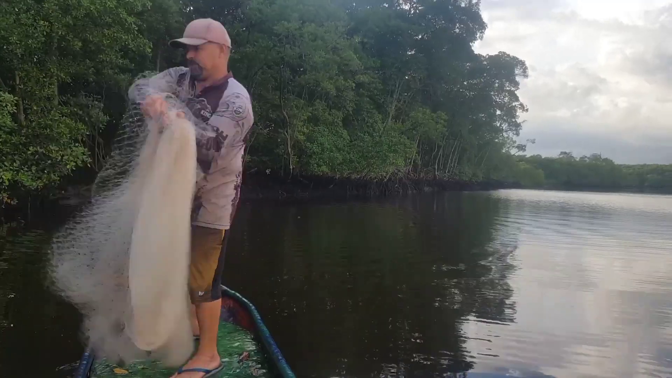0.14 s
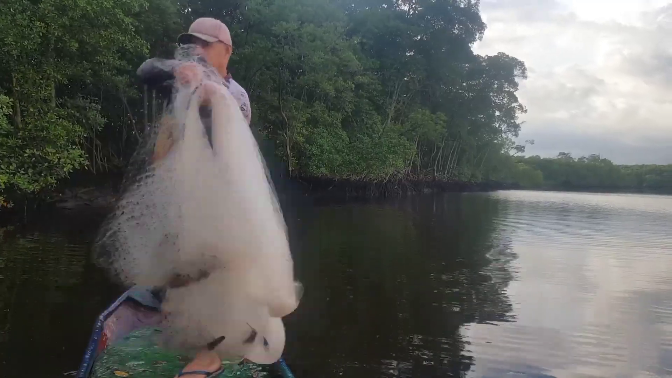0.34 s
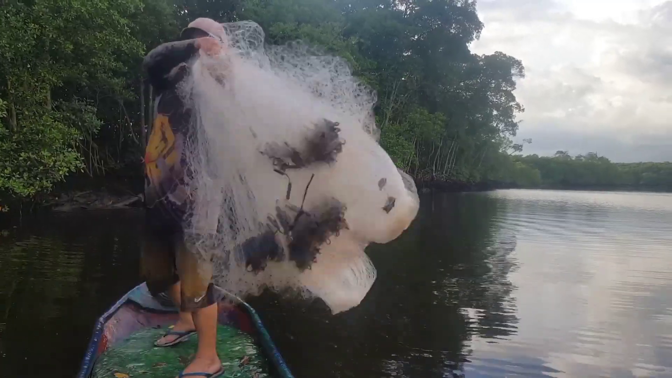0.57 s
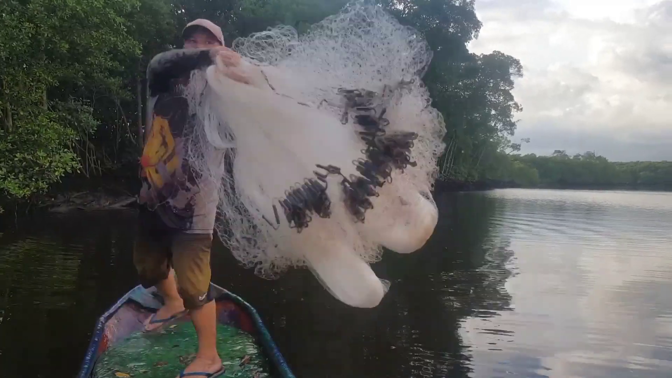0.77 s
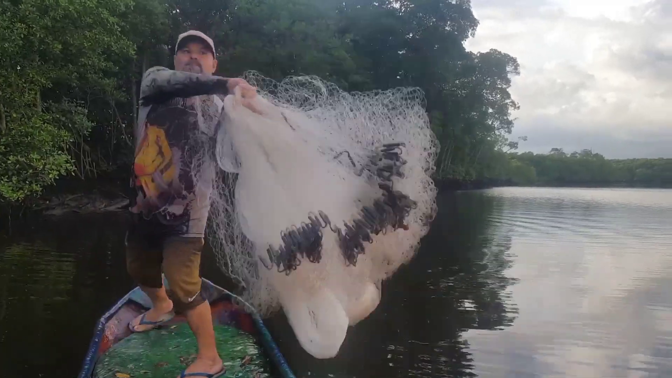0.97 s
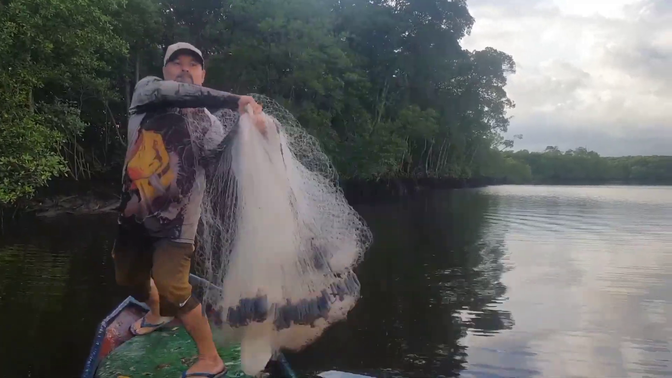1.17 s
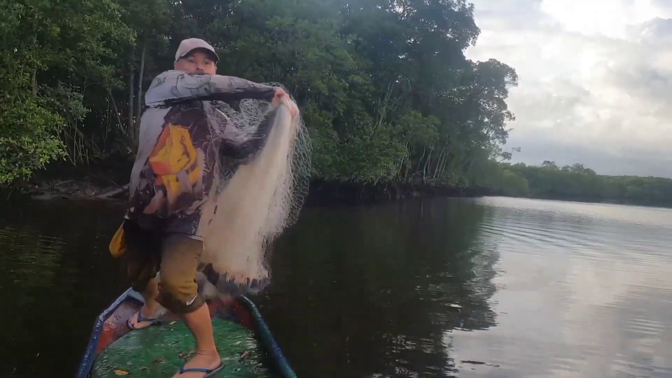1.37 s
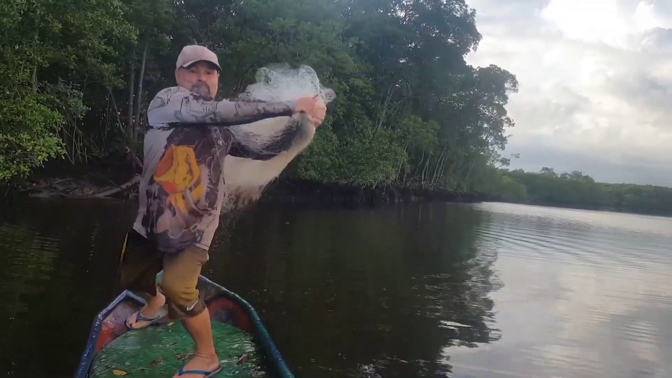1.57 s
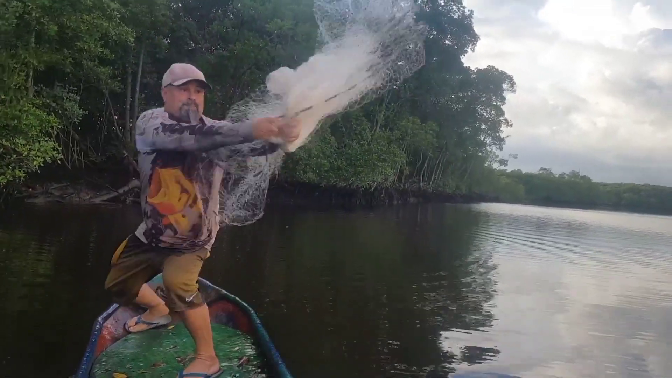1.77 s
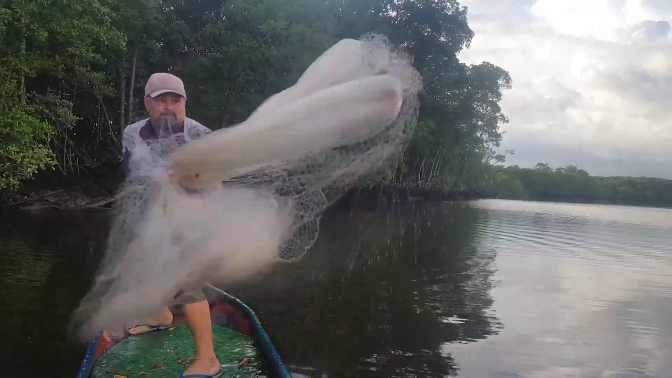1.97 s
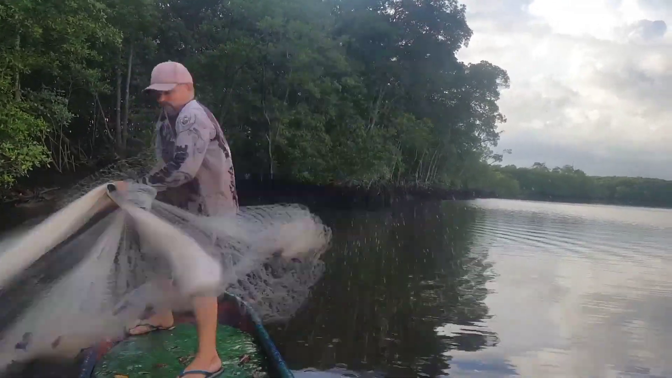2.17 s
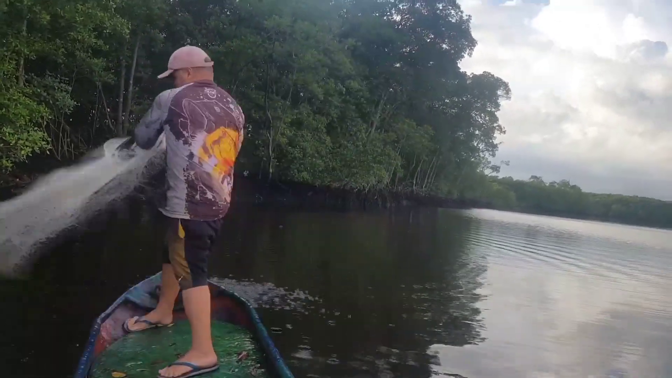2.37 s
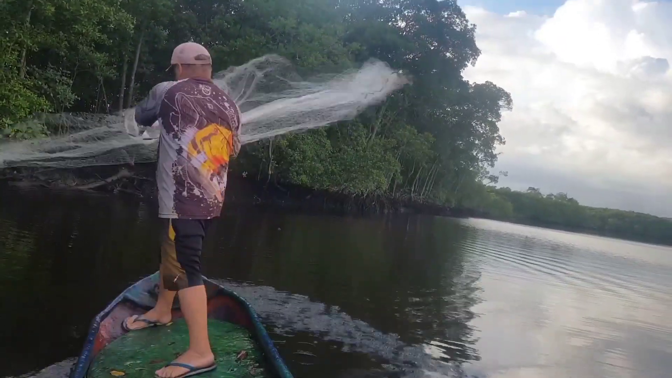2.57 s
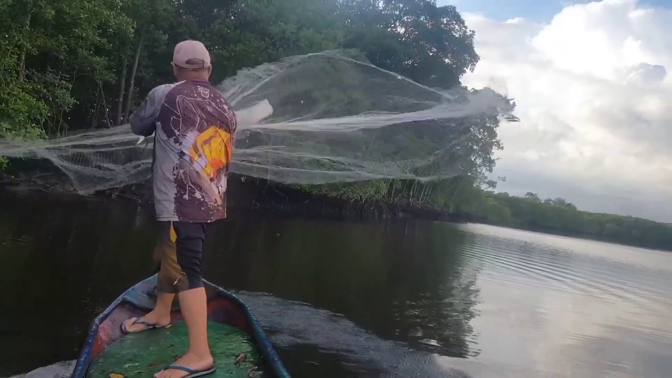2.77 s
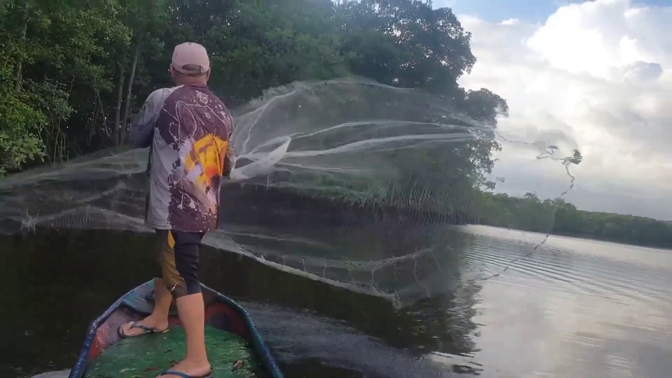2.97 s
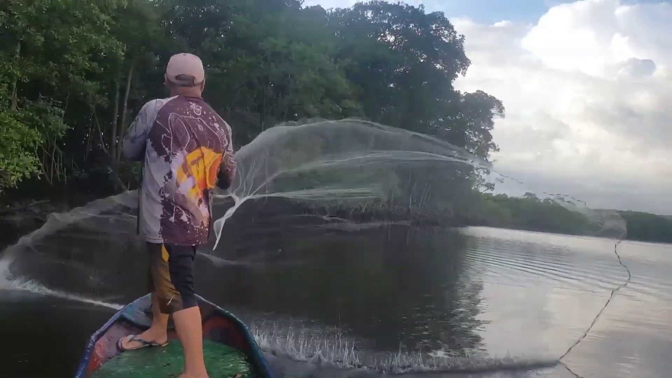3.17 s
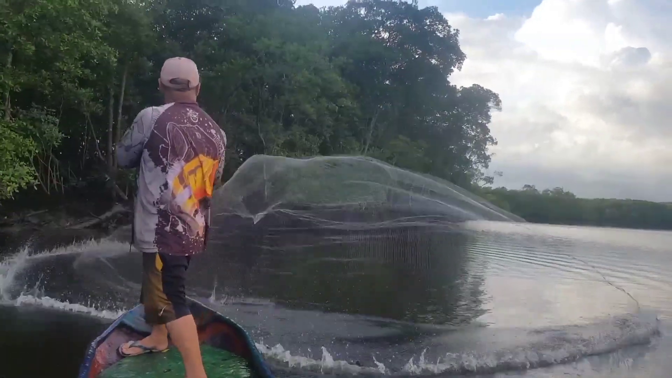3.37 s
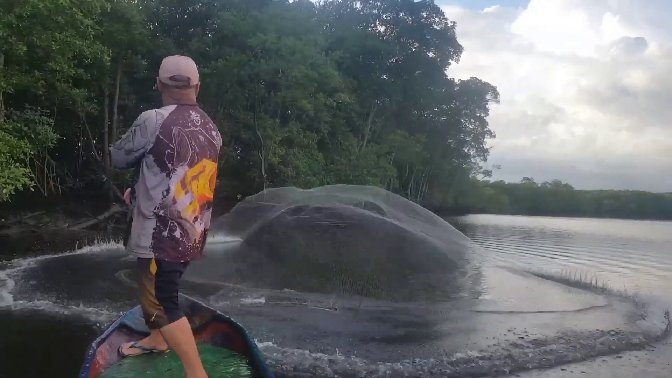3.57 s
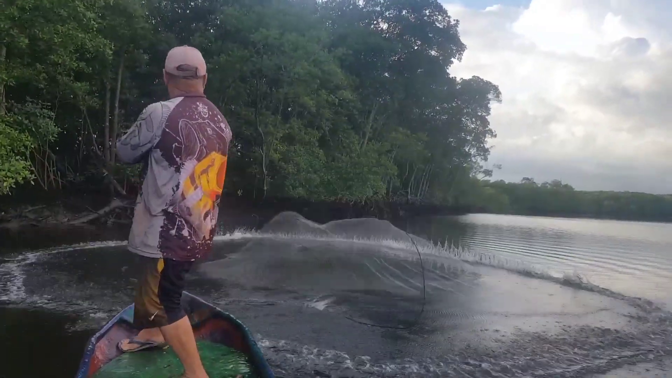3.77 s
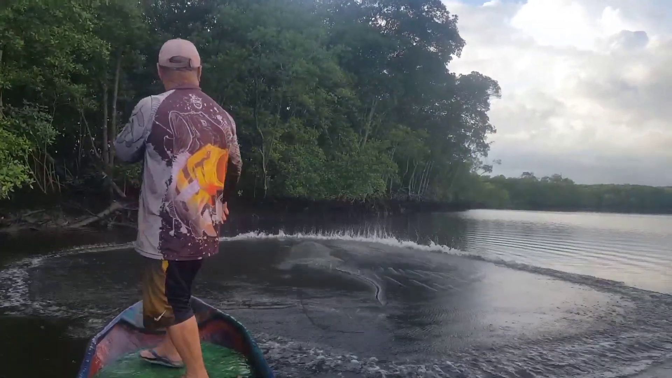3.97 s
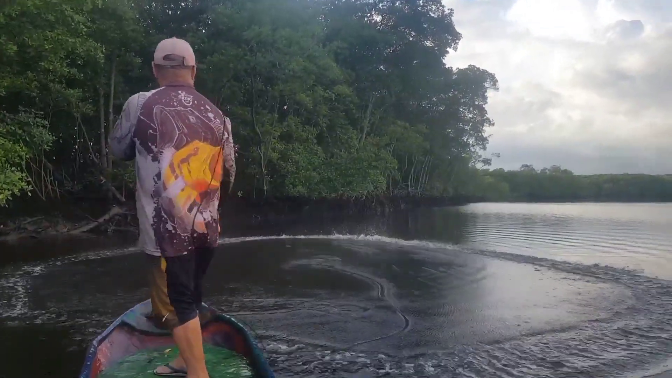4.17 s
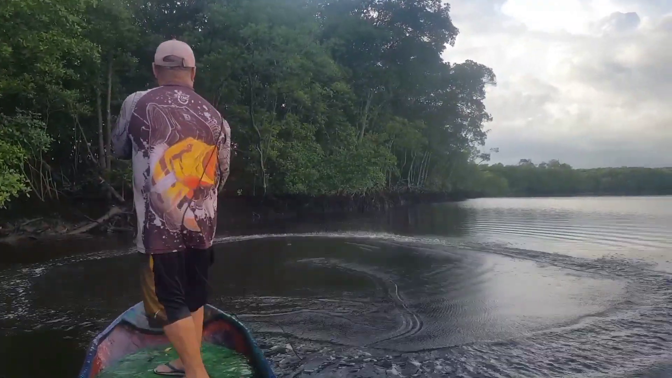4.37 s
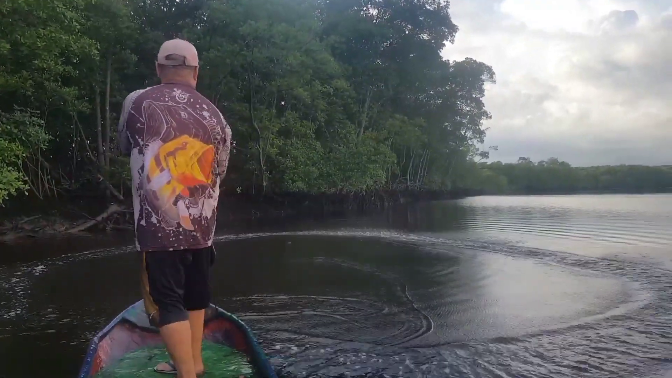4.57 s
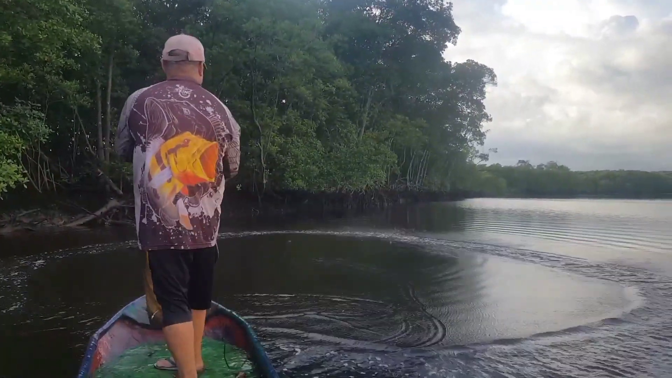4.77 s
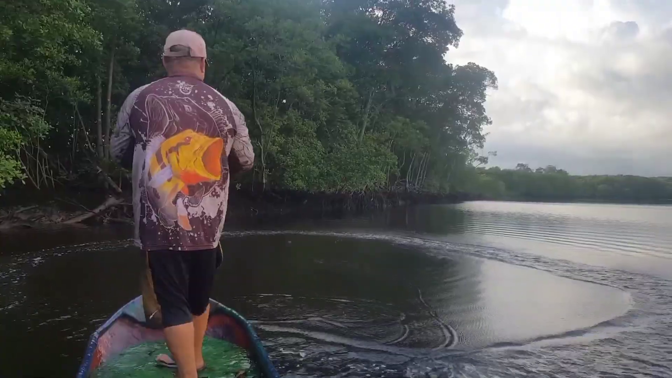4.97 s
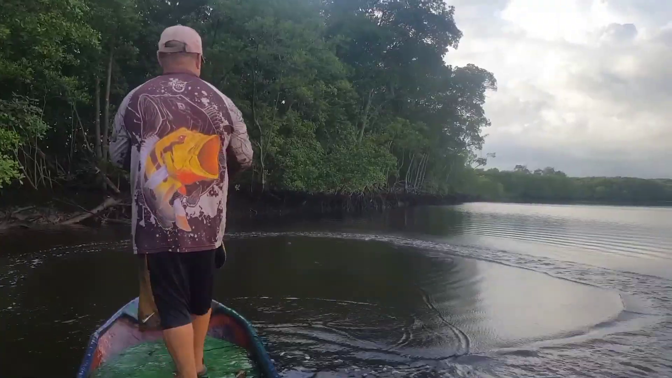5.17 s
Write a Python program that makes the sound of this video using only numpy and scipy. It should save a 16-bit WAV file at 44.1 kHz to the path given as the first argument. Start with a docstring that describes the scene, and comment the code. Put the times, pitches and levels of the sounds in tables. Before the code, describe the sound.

Close outdoor stereo: light mesh rustles, small ticks and dull wooden thumps, with thin bird chirps echoing in trees. A sharp hull knock comes before the throw, then a swish of net with bright metallic clinking. The net lands with sharp smacks and a broad pattering splash, bubbles froth and gurgle, and the water calms to quiet drips and faint boat knocks over a soft air bed.

```python
"""A cast net is swung and thrown from a small wooden boat on a calm river lined with trees.
Its wet mesh rustles as coloured random clicks and flaps as dull bubbles; lead weights ring as struck modes.
The rim strikes the water in a ring of spray clicks and ringing bubbles that dies to single rising drips.
Feet and gear knock the hull, noise pushed through its modes. Small birds whistle in gliding sines,
echoed by the trees, over a soft bed of filtered noise for the air."""
import sys
import numpy as np
from scipy import signal
from scipy.io import wavfile
from scipy.ndimage import map_coordinates

SR = 44100
rng = np.random.default_rng(int(sys.argv[2]) if len(sys.argv) > 2 else 0)


def transcribe(signal):
    """Save signal, clipped to [-1, 1], as a 16-bit WAV file at the path in sys.argv[1]."""
    frames = np.atleast_2d(signal).T
    limited = np.clip(frames, -1, 1)
    pcm = np.round(limited * 32767).astype(np.int16)
    wavfile.write(sys.argv[1], SR, pcm)


N = 230907  # length in samples

# the gathered net swings round and opens in the air: (time [s], rustle level [dB])
NET_SWING = [(1.1, -57), (1.16, -58), (1.36, -52.5), (1.44, -45.5), (1.71, -54.5), (1.85, -61), (1.96, -40),
             (2.1, -44.5), (2.21, -35), (2.41, -41), (2.74, -47.5), (3.07, -50), (3.13, -55), (3.15, -90)]
# tugs at the wet mesh: (time of the top [s], rustle level [dB], dull flapping level [dB], fall constant [s])
MESH_TUGS = [(0.066, -54.5, -56, 0.059), (0.157, -45, -28, 0.02), (0.2, -52, -51, 0.021),
             (0.236, -48.5, -47.5, 0.045), (0.372, -56, -61, 0.43), (0.89, -52.5, -45.5, 0.048),
             (1.05, -55, -33, 0.011), (1.152, -45.5, -39, 0.047), (1.231, -49, -36.5, 0.014),
             (1.286, -53, -33.5, 0.012), (1.439, -67, -45, 0.12), (1.778, -42.5, -43, 0.06),
             (2.1, -48, -39.5, 0.028), (2.209, -52, -35, 0.042), (2.979, -40.5, -43.5, 0.01),
             (3.091, -53, -47, 0.017)]
# tone of the rustling mesh: (frequency [Hz], relative level [dB per Hz])
MESH_TONE = [(530, -29), (900, -0.5), (1370, -9.5), (1470, -7), (2780, -0.5), (3250, -11.5), (4180, -5.5),
             (6660, -13.5), (9320, -18.5), (12600, -21.5), (15800, -34)]
TUG_RISE_S = 0.0051
SWING_FLAP_DB = -8  # flapping relative to the rustle


def net():
    """Wet mesh rubs in countless tiny clicks; its dull flapping is made of short ringing bubbles."""
    swing = amp(in_time(NET_SWING)[0])
    tugs = np.array(MESH_TUGS)
    tug_rustle, tug_flap = swells(tugs[:, :3], TUG_RISE_S, tugs[:, 3:])
    rubbing = [grains(4000, 2.5), grains(4000, 1.83)]
    mesh = (swing + tug_rustle) * rms_one(colour(rubbing, MESH_TONE, patchy_db=2.5))
    flapping = bubbles(336, 1810, per_s=1400, cycles=7.6, usual_hz=645, octaves=4.7)
    return mesh + (amp(SWING_FLAP_DB) * swing + tug_flap) * flapping


# lead weights rattling together:
# (time [s], peak of the lower modes [dB], upper modes relative to it [dB], left minus right [dB])
WEIGHT_CLINKS = [(1.2493, -34, -26, -3), (1.4057, -35, -10, -6), (1.927, -30, -6, -4),
                 (1.942, -32.5, -4, -2.0), (1.955, -22, -17, -1), (1.964, -20.5, -11, -6),
                 (1.98, -20, -4, 2), (1.9916, -20.5, -1, -4), (2.005, -31, -35, -5), (2.181, -38, 1, -3),
                 (2.209, -28.5, -7, -2), (2.227, -31, -21, 7), (2.288, -16, -15, -2), (2.2927, -24, 11, 1),
                 (2.309, -27, 4, -2), (2.315, -17.5, -2, -1), (2.3361, -16.5, -5, -3), (2.343, -26, -18, 2),
                 (2.359, -20, -15, -4), (2.3662, -20, -13, 1), (2.572, -26.5, -5, -5),
                 (2.744, -28.5, -13, -3), (2.8388, -35.5, 2, -4)]
# usual lower modes of a weight: (frequency [Hz], level [dB], decay by 60 dB [s])
WEIGHT_MODES = [(4350, -11, 0.029), (5310, -4.5, 0.035), (5640, 5, 0.012)]
# usual upper modes of a weight: (frequency [Hz], level [dB], decay by 60 dB [s])
WEIGHT_UPPER_MODES = [(10400, 10.5, 0.01), (12630, 9, 0.0081), (12960, 16, 0.0092), (14600, -15, .005)]


def lead_weights():
    """Each clink is a quick uneven rattle of three weights; no two are cast alike, so their modes differ."""
    out, t = np.zeros((2, N)), np.arange(int(0.06 * SR)) / SR
    for s, db, upper_db, pan_db in WEIGHT_CLINKS:
        touches = (rng.random((3, len(t))) < 500 / SR) * np.exp(-t / 0.0065)
        touches[0, 0] = 0.98  # the first touch is certain
        luck = rng.standard_normal((3, 7, 2))  # weight, mode, (level, pitch)
        rings = []
        for k, (hz, mode_db, t60) in enumerate(WEIGHT_MODES + WEIGHT_UPPER_MODES):
            mode = 0
            for w in range(3):
                shared = rng.standard_normal(len(t))
                strike = touches[w] * (shared + 1.3 * rng.standard_normal((2, len(t))))
                own_hz = hz * (1 + 0.0464 * luck[w, k, 1])
                mode = mode + amp(mode_db + 2.1 * luck[w, k, 0]) * ring(strike, own_hz, t60)
            rings.append(mode)
        lower = peak_one(sum(rings[:len(WEIGHT_MODES)]))
        upper = peak_one(sum(rings[len(WEIGHT_MODES):]))
        add(out, s, amp(db) * (lower + amp(upper_db) * upper) * panned(pan_db)[:, None])
    return out


# the rim lands, the ring spreads, the water settles: (time [s], spray level [dB])
WATER_CHURN = [(3.12, -69), (3.136, -34), (3.15, -28), (3.2, -29), (3.34, -32), (3.64, -30), (3.8, -28.5),
               (3.95, -35.5), (4.15, -33.5), (4.26, -36.5), (4.33, -40.5), (4.45, -44.5), (4.68, -55),
               (5.236, -58.5)]
# large bubbles: (time [s], level [dB], usual pitch [Hz])
BIG_BUBBLES = [(3.13, -83, 560), (3.2, -47, 550), (3.34, -30, 497), (3.41, -24, 463), (3.47, -25.5, 655),
               (3.56, -24, 517), (3.64, -27.5, 610), (3.78, -25.5, 458), (3.82, -33.5, 420),
               (3.95, -37.5, 434), (4.26, -41, 553), (4.43, -47, 440), (4.68, -56, 430), (5.236, -72, 306)]
# a stretch of rim slaps down or water slops:
# (start of the top [s], spray level [dB], froth level [dB], large bubble level [dB], length of the top [s])
WATER_SURGES = [(3.22, -25.5, -29.5, -24, 0.027), (3.244, -34, -24, -22.5, 0.04),
                (3.705, -59, -30.5, -45, 0.079), (3.798, -34, -31, -54, 0.023),
                (3.865, -33.5, -26, -27.5, 0.034), (4.193, -44, -44.5, -50, 0.089),
                (4.686, -50, -47, -49, 0.005), (4.71, -60, -51, -39, 0.039), (4.752, -48, -78, -59, 0.048),
                (4.949, -78, -49.5, -53, 0.022), (5.011, -69, -47, -44.5, 0.018),
                (5.136, -54, -51.5, -53, 0.011)]
# tone of the spray: (frequency [Hz], relative level [dB per Hz])
SPRAY_TONE = [(880, -18.5), (1500, -3.5), (1580, -1), (2360, -1.5), (2550, -3.5), (4700, -4), (6320, -12),
              (9560, -17.5), (13100, -27.5), (15800, -39)]
SURGE_RISE_S, SURGE_FALL_S = 0.0067, 0.0076
FROTH_LAG_S = 0.041  # small bubbles follow the spray


def splash_ring():
    """Spray patters in random clicks, small bubbles froth up after it and large ones gurgle below."""
    churn = amp(in_time(WATER_CHURN)[0])
    churn_late = amp(in_time([(s + FROTH_LAG_S, db) for s, db in WATER_CHURN])[0])
    big_db, big_hz = in_time(BIG_BUBBLES)
    surges = np.array(WATER_SURGES)
    surge_spray, surge_froth, surge_big = swells(surges[:, :4], SURGE_RISE_S, SURGE_FALL_S, surges[:, 4:])
    patter = [grains(5000, 2.0), grains(5000, 1.64)]
    spray = (churn + surge_spray) * rms_one(colour(patter, SPRAY_TONE, patchy_db=1.2))
    small = bubbles(666, 3135, per_s=1000, cycles=26.4, usual_hz=1126, octaves=0.91)
    froth = (churn_late + surge_froth) * small
    large = bubbles(185, 835, per_s=2500, cycles=29.0, usual_hz=np.maximum(big_hz, 200), octaves=0.67)
    gurgle = (amp(big_db) + surge_big) * large
    return spray + froth + gurgle


# sinkers and heavy drops slapping the surface: (time [s], peak level [dB], cavity pitch [Hz])
SURFACE_SLAPS = [(3.179, -30, 1900), (3.2123, -14, 1500), (3.228, -23, 1000), (3.241, -15, 1260),
                 (3.2524, -8.5, 300), (3.263, -9, 1850), (3.266, -9, 690), (3.28, -25, 620),
                 (3.382, -20, 630), (3.4, -20, 450), (3.657, -18.5, 594), (3.87, -15, 1080),
                 (3.886, -26, 900), (4.173, -14.5, 1340)]
SLAP_CYCLES = 5.2  # the cavity falls by 60 dB in this many cycles


def slaps():
    """A sharp smack on the surface; the cavity it opens rings a few cycles."""
    out, t = np.zeros((2, N)), np.arange(int(0.036 * SR)) / SR
    for s, db, hz in SURFACE_SLAPS:
        smack = rng.standard_normal((2, len(t))) * np.exp(-t / 0.00075)
        smack[0, 0] += 4.0
        smack = spread(smack, hz)
        cavity = peak_one(band(ring(smack, hz, SLAP_CYCLES / hz), hz / 2, 2 * hz))
        edge = peak_one(band(smack, hz, 5000))
        add(out, s, amp(db) * peak_one(cavity + 0.22 * edge))
    return out


# single drips: (time [s], level before the fade-in [dB], nominal pitch [Hz], decay by 60 dB [s])
WATER_DRIPS = [(1.478, -30, 3920, 0.03), (1.772, -13.5, 2150, 0.022), (1.772, -26.5, 985, 0.04),
               (2.406, -30, 660, 0.095), (2.487, -37, 714, 0.1), (3.268, -11.5, 635, 0.059),
               (3.443, -13.5, 608, 0.075), (3.766, -7, 417, 0.039), (3.297, -15.5, 642, 0.065),
               (4.406, -36, 1200, 0.024), (4.458, -29, 1760, .03), (4.458, -28, 1220, 0.018),
               (4.505, -35, 1060, 0.033), (4.566, -34, 896, 0.052), (4.707, -23, 640, 0.039),
               (4.602, -36, 592, 0.11), (4.845, -39, 1590, 0.041), (4.862, -29, 1685, 0.019),
               (4.948, -40, 930, 0.19), (5.093, -25, 1475, 0.02)]


def drips():
    """A drop traps one bubble whose pitch rises as it dies."""
    out, t = np.zeros(N), np.arange(int(.15 * SR)) / SR
    for s, db, hz, t60 in WATER_DRIPS:
        tone = np.sin(2 * np.pi * hz * (.94 * t + 0.11 * t * t / t60))  # from 6% below nominal upward
        add(out, s, tone * amp(db - 60 * t / t60) * np.minimum(t / 0.0041, 1))
    return out


# dry ticks of cord and drops: (time [s], peak level [dB], centre frequency [Hz])
CORD_TICKS = [(0.0625, -35, 2580), (0.1361, -30.5, 2700), (0.156, -24, 2400), (0.229, -35, 5800),
              (0.668, -21.5, 8300), (1.001, -40, 5600), (1.043, -28, 1700), (1.1182, -38, 4100),
              (1.135, -33, 5000), (1.147, -36, 5000), (1.158, -22, 5900), (1.321, -34.5, 8000),
              (1.428, -31, 7000), (1.443, -25.5, 2190), (1.5123, -31, 5000), (1.5338, -23, 6300),
              (1.5762, -33, 6440), (1.5967, -31, 4700), (1.705, -32, 4000), (2.2109, -37, 2500),
              (2.294, -6, 9000), (2.37, -13.5, 8850), (2.5717, -22, 2200), (2.5718, -18.5, 6940),
              (2.7467, -24.5, 9000), (2.937, -25, 4240), (2.974, -28, 1800), (2.9854, -27, 3400),
              (3.046, -31, 3100), (4.545, -35, 7000), (4.8708, -30, 1800), (4.995, -39, 2200),
              (5.014, -36, 3200), (5.145, -31, 2000), (5.212, -35.5, 4500)]
TICK_SPAN = 1.34  # the band reaches this factor above and below its centre


def ticks():
    """Snaps of noise a millisecond or two long, each in a band of its own."""
    out, t = np.zeros((2, N)), np.arange(int(0.03 * SR)) / SR
    for s, db, hz in CORD_TICKS:
        snap = rng.standard_normal((2, len(t))) * np.exp(-t / 0.0011)
        snap[0, 0] += 3.0
        add(out, s, amp(db) * peak_one(band(spread(snap, 1800), hz / TICK_SPAN, hz * TICK_SPAN)))
    return out


# modes of the planks: (frequency [Hz], level [dB], decay by 60 dB [s])
PLANK_MODES = [(76.3, -1.5, 0.093), (105.8, 0, 0.13), (154.3, 1, 0.063), (204.2, -5.5, 0.096),
               (281.4, -5, 0.048), (337.4, -13.5, 0.11), (469, -8.5, 0.024), (585, -15.5, 0.052)]


def planks(force):
    """The hull's modes ring side by side, with alternating sign."""
    return sum(amp(db) * ring(force, hz, t60) * (-1) ** k for k, (hz, db, t60) in enumerate(PLANK_MODES))


# blows on the hull:
# (time [s], thud peak [dB], boom relative to it [dB], crack relative to it [dB], scuffle decay constant [s])
HULL_BLOWS = [(0.139, -33.5, -5, 2.5, 0.074), (0.156, -34, 5.5, 12.5, 0.056),
              (0.189, -31, -0.5, -22, 0.0085), (0.885, -34, 9, 1.5, 0.038), (0.917, -28, -14, -8, 0.025),
              (1.044, -24.5, -3.5, 6, 0.022), (1.229, -33, -13, -19, 0.0083),
              (1.277, -10.5, 0.5, -18, 0.01), (1.291, -13.5, 4, -27, 0.02), (1.419, -21.5, -2, -14, 0.066),
              (1.773, -26.5, -26, -2, 0.059), (1.869, -30.5, -26, -4, 0.0089),
              (1.968, -33.5, 6.5, -2, 0.022), (2.002, -26.5, -23, 3, 0.034), (2.204, -28, 3, -2, 0.032),
              (2.47, -47, 16, -5, 0.028), (3.486, -17, -7, -27, 0.067), (3.863, -19, -34, -4, 0.076),
              (4.251, -31.5, 3, -1, 0.021), (4.707, -25.5, -11, -7, 0.023), (4.726, -47, 0, -15, 0.019),
              (5.015, -37, -6, -19, 0.11)]
# weight shifts and the hull rumbles up for a moment: (time of the top [s], level [dB])
WEIGHT_SHIFTS = [(1.35, -38), (1.92, -44), (2.36, -42), (4.0, -39.5), (4.26, -51), (4.75, -52), (5.22, -58)]
LURCH_RISE_S, LURCH_FALL_S, RUMBLE_DB = 0.14, 0.1, -49.5


def hull():
    """Each blow is a push and a scuffle: a thud, the boom of the planks, a crack; a rumble runs below."""
    out, t = np.zeros((2, N)), np.arange(int(.25 * SR)) / SR
    for s, db, boom_db, crack_db, length in HULL_BLOWS:
        scuffle = rng.standard_normal((2, len(t))) * np.exp(-t / max(length, .002))
        scuffle[0, 0] += 40  # the push
        ringing = planks(scuffle[0])
        thud = peak_one(band(band(ringing + 15 * scuffle[0], 130, 750), 110, 900))
        boom = peak_one(band(band(ringing, 79.7, 191), 72.5, 205))
        crack = peak_one(spread(band(scuffle * np.exp(-t / 0.036), 700, 2070), 900))
        add(out, s, amp(db) * (thud + amp(boom_db) * boom + amp(crack_db) * crack))
    rumble = rms_one(spread(band(planks(rng.standard_normal((2, N))), 35, 340), 160))
    return out + (amp(RUMBLE_DB) + swells(WEIGHT_SHIFTS, LURCH_RISE_S, LURCH_FALL_S)[0]) * rumble


# bird notes: (start [s], end [s], start pitch [Hz], end pitch [Hz], level before hoarseness and echo [dB])
BIRD_NOTES = [(0, 0.057, 3930, 3540, -52.5), (0, 0.032, 7750, 7700, -59), (.185, 0.3, 8800, 7560, -63),
              (0.256, 0.268, 5000, 4100, -59), (0.317, 0.412, 7040, 6660, -65),
              (0.379, 0.416, 6800, 5530, -50.5), (0.482, 0.506, 5000, 3750, -51.5),
              (0.65, 0.683, 5740, 3850, -52), (0.642, 0.726, 2850, 3000, -62),
              (1.165, 1.26, 7900, 7350, -64), (1.195, 1.223, 5600, 5310, -58),
              (0.714, 0.815, 6620, 4470, -49.5), (1.056, 1.085, 3990, 3140, -55.5),
              (0.92, 1.09, 8300, 7500, -66), (1.366, 1.392, 5400, 3780, -50.5),
              (1.818, 1.865, 6020, 5480, -52.5), (4.887, 4.96, 5350, 5050, -66),
              (5.12, 5.168, 8100, 9050, -58), (5.202, 5.233, 6450, 6600, -61)]
FLATTEN_PER_S, HOARSE_DB, WAVER_HZ = 11, 4.5, 55  # long notes level out more than short ones
TREES_DB, TREES_T60_S, DIRECT_DB = -27.5, .45, 0.8


def birds():
    """Gliding, slightly hoarse whistles that flatten out, smeared by echoes among the trees."""
    out, waver = np.zeros(N), WAVER_HZ * drift(146)
    for start, end, from_hz, to_hz, db in BIRD_NOTES:
        u = np.linspace(0, 1, int((end - start) * SR))
        glide = (1 - u) ** (1 + FLATTEN_PER_S * (end - start))
        pitch = to_hz + (from_hz - to_hz) * glide + waver[int(start * SR):][:len(u)]
        # notes at time zero are already sounding
        fade = np.clip(np.minimum(20.0 * u + (start == 0), 3.5 * (1 - u)), 0, 1)
        add(out, start, amp(db) * np.sin(2 * np.pi * np.cumsum(pitch) / SR) * fade)
    t = np.arange(int(.5 * SR)) / SR
    echoes = amp(TREES_DB - 60 * t / TREES_T60_S) * rng.standard_normal((2, len(t)))
    direct = out * amp(HOARSE_DB * drift(200) + DIRECT_DB) * [[1], [.6]]  # stronger on the left
    return direct + signal.fftconvolve(out[None], echoes, axes=1)[:, :N]


# tone of the air: (frequency [Hz], relative level [dB per Hz])
AIR_TONE = [(12, -35), (20, 0), (38, -13), (95, 1.5), (181, -2), (292, -2.5), (733, -20.5), (942, -19),
            (2000, -29.5), (2240, -9.5), (3220, -22.5), (5470, -18), (9560, -22), (13000, -31),
            (15800, -44)]
AIR_DB = -50


def air():
    """A soft bed of noise whose bands flicker separately."""
    return amp(AIR_DB) * rms_one(colour(rng.standard_normal((2, 2, N)), AIR_TONE, patchy_db=2.2))


def bubbles(low_hz, high_hz, per_s, cycles, usual_hz, octaves):
    """Trapped air rings for some cycles; sizes near the usual one weigh the most."""
    born = grains(per_s * amp(1.6 * drift(15)), spread_db=1.5)
    dealt = rng.integers(0, 16, N)  # which of 16 sizes each bubble gets
    pitches = np.geomspace(low_hz, high_hz, 16)
    weights = [np.exp(-.5 * (np.log2(hz / usual_hz) / octaves) ** 2) for hz in pitches]
    total = np.sqrt(sum(w ** 2 for w in weights))
    rings = 0
    for k, hz in enumerate(pitches):
        voice = ring(born * (dealt == k) * weights[k] / total, hz, cycles / hz)
        rings = rings + spread(voice, hz) * np.sqrt(hz)
    return rms_one(band(rings, 0.8 * low_hz, 1.02 * high_hz))


def grains(per_s, spread_db):
    """Random clicks of uneven size; mid and side rows share the moments."""
    size = amp(spread_db * np.minimum(rng.exponential(1, N), 5)) * (rng.random(N) < per_s / SR)
    return size * rng.standard_normal((2, N))


TREBLE_LEAN_DB = -1  # left minus right, per octave above 2.5 kHz


def colour(sources, spectrum, patchy_db):
    """Half-octave bands with their own level and flicker; neighbours take turns among the sources."""
    out, edges = 0, 20 * 2 ** np.arange(0, 10, .5)
    for k, (low, high) in enumerate(zip(edges, edges[1:])):
        hz = np.sqrt(low * high)
        if hz > spectrum[0][0] / 2:
            part = band(sources[k % len(sources)] + 1e-18, low, high)
            gain = amp(at_hz(spectrum, hz) + patchy_db * drift(15.2))
            lean = panned(TREBLE_LEAN_DB * max(np.log2(hz / 2500), 0))
            out = out + gain * spread(part, hz) * lean[:, None]
    return out


def ring(x, hz, t60):
    """A unit click sets a sine of height 1 ringing."""
    r, w = amp(-60 / (t60 * SR)), 2 * np.pi * hz / SR
    return signal.lfilter([0, np.sin(w)], [1, -2 * r * np.cos(w), r * r], x + 1e-18)


def band(x, low_hz, high_hz):
    """Keeps what lies between two frequencies."""
    return signal.sosfilt(signal.butter(2, [low_hz, high_hz], "band", fs=SR, output="sos"), x)


def drift(rate):
    """Smoothed chance of spread 1; a higher rate [Hz] moves faster."""
    r = np.exp(-80 * np.pi * rate / SR)  # drawn at every 40th sample
    steps = rng.standard_normal(N // 40 + 2002)
    slow = signal.lfilter([1], [1, -2 * r, r * r], steps)[2000:]
    return np.interp(np.arange(N) / 40, np.arange(len(slow)), rms_one(slow))


def swells(rows, rise_s, fall_s, hold_s=0):
    """Gain of each level column: it climbs to the top of every row, holds and dies away."""
    s, *columns = np.transpose(rows)
    coarse = np.arange(0, N, 20)
    late = coarse / SR - s[:, None]
    rise = late / max(rise_s, 1e-3)
    fall = -np.maximum(late - hold_s, 0) / np.maximum(fall_s, 1e-3)
    shape = np.exp(np.where(late < 0, rise, fall))
    return [np.interp(np.arange(N), coarse, amp(c) @ shape) for c in columns]


def in_time(rows):
    """Columns joined by lines; -120 before the first row, the last value held after the last."""
    s, *columns = np.transpose(rows)
    return [np.interp(np.arange(N) / SR, s, c, left=-120, right=c[-1]) for c in columns]


def at_hz(points, hz):
    """Reads a (frequency, value) table along a log frequency axis."""
    return np.interp(np.log(hz), np.log(np.array(points)[:, 0] + 1), np.array(points)[:, 1])


def amp(db):
    """Decibels to gain."""
    return 10 ** (np.asarray(db) / 20)


def rms_one(x):
    """Scales to an RMS of 1."""
    return x / np.sqrt(np.mean(x ** 2) + 1e-20)


def peak_one(x):
    """Scales to a peak of 1."""
    return x / np.abs(x).max()


def add(out, s, x):
    """Mixes a short sound in at time s."""
    at = round(s * SR)
    out[..., at:at + x.shape[-1]] += x[..., :N - at]


def panned(pan_db):
    """Left and right gains, pan_db apart."""
    return amp(np.array([pan_db, -pan_db]) / 2)


# likeness of left and right: (frequency [Hz], correlation)
PORT_LIKENESS = [(25, .3), (80, 1), (290, 0.92), (640, 0.99), (1400, 0.32), (3100, 0.083), (15000, 0.053)]


def spread(mid_side, hz):
    """Two spaced ports share more of the sound at some pitches than at others."""
    alike = np.clip(at_hz(PORT_LIKENESS, hz), -1, 1)
    return np.sqrt(1 + alike) * mid_side[0] + np.sqrt(1 - alike) * mid_side[1] * [[1], [-1]]


# lateness at the left port; the net swings on the left, the ring closes on the right: (time [s], delay [us])
LEFT_DELAY = [(0.2, 5), (0.6, -200), (3.3, -200), (3.5, 166), (4.3, 50), (5.2, -55)]


def two_ports(x):
    """The port farther from the source hears it a moment later."""
    s, micro = np.transpose(LEFT_DELAY)
    at = np.arange(N)
    half = np.interp(at / SR, s, micro) * SR / 2e6  # half the delay, in samples
    left = map_coordinates(x[0], [at - half], order=3)
    right = map_coordinates(x[1], [at + half], order=3)
    return np.array([left, right])


def scene():
    """Net, water and boat shift between the ports; weights, birds and air do not."""
    moving = net() + splash_ring() + slaps() + drips() + ticks() + hull()
    return two_ports(moving) + lead_weights() + birds() + air()


# treble dip of the microphone port: (centre [Hz], width [Hz], level [dB])
TREBLE_DIP = (9700, 9050, -18.5)
CUTOFF_HZ = 16300


def record(dry):
    """The port swallows one band of treble; the top is cut steeply."""
    hz, width, db = TREBLE_DIP
    w, a = 2 * np.pi * hz / SR, np.pi * width / SR
    zeros = [1 + a * amp(db), -2 * np.cos(w), 1 - a * amp(db)]
    poles = [1 + a, -2 * np.cos(w), 1 - a]
    dipped = signal.lfilter(zeros, poles, dry)
    return signal.sosfilt(signal.cheby2(16, 70, CUTOFF_HZ, fs=SR, output="sos"), dipped)


dry = scene()
out = record(dry)
transcribe(out)
```